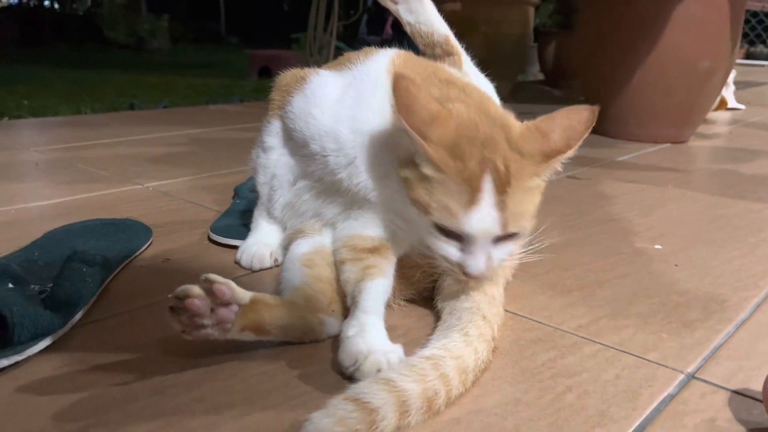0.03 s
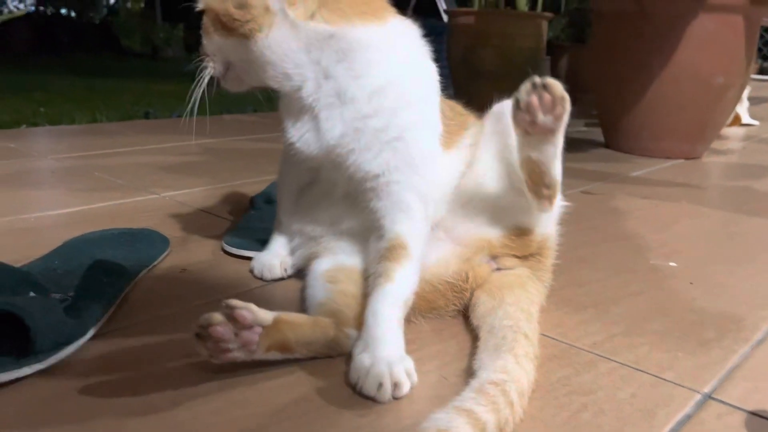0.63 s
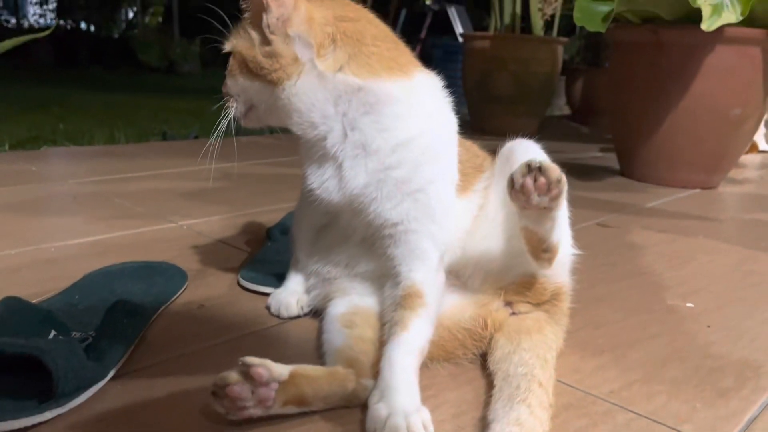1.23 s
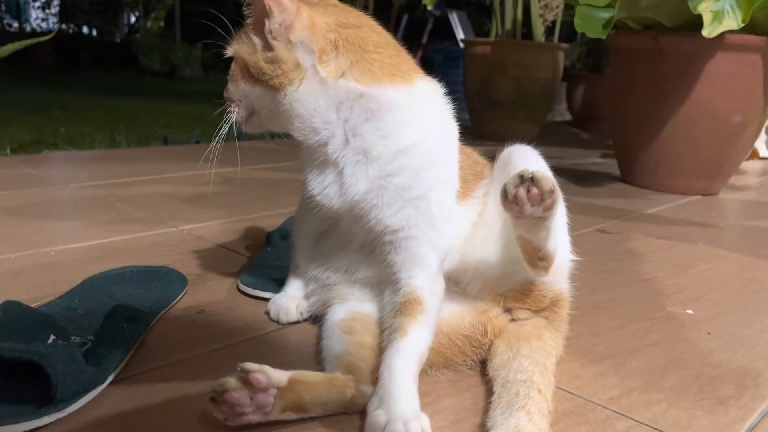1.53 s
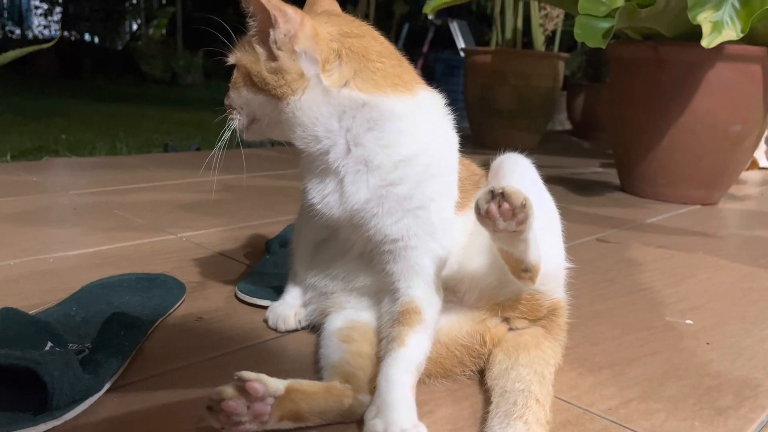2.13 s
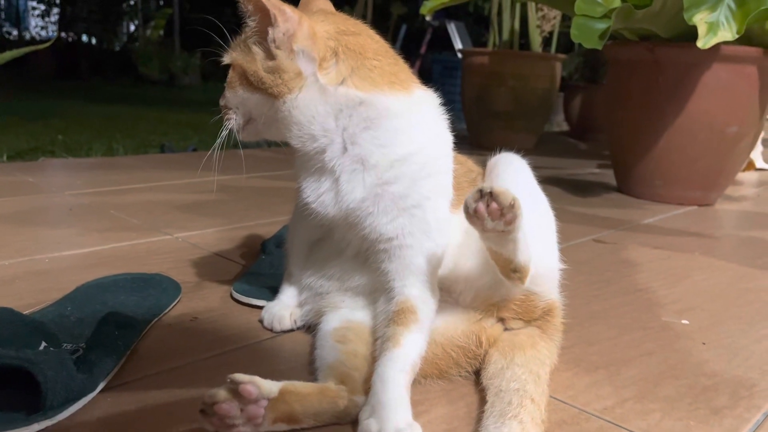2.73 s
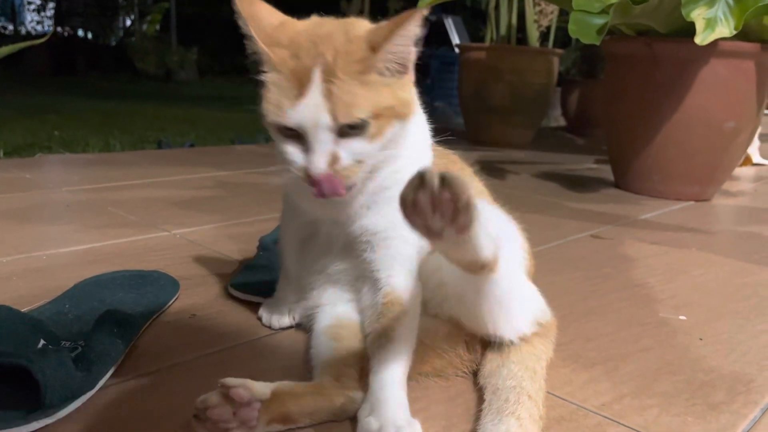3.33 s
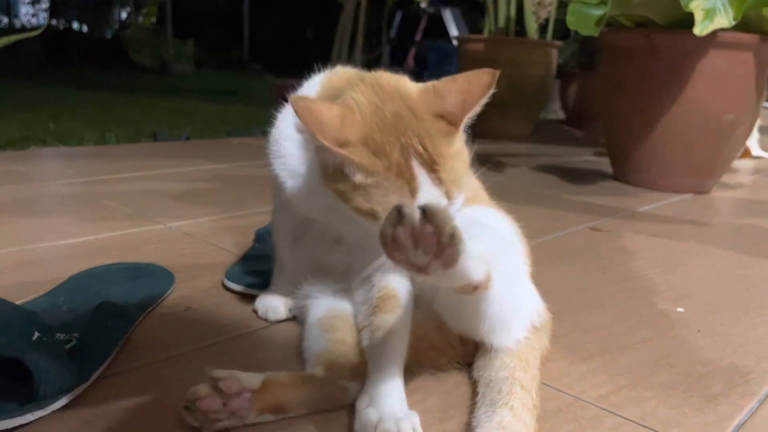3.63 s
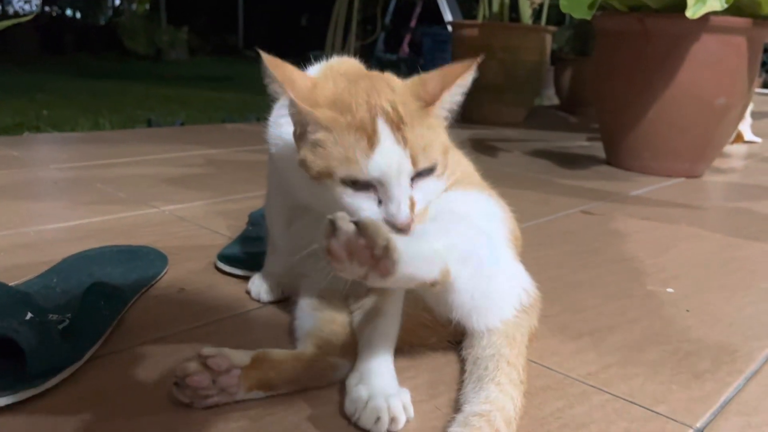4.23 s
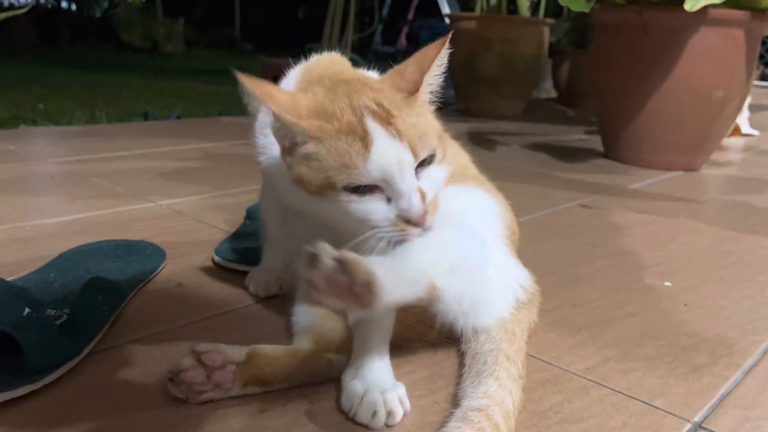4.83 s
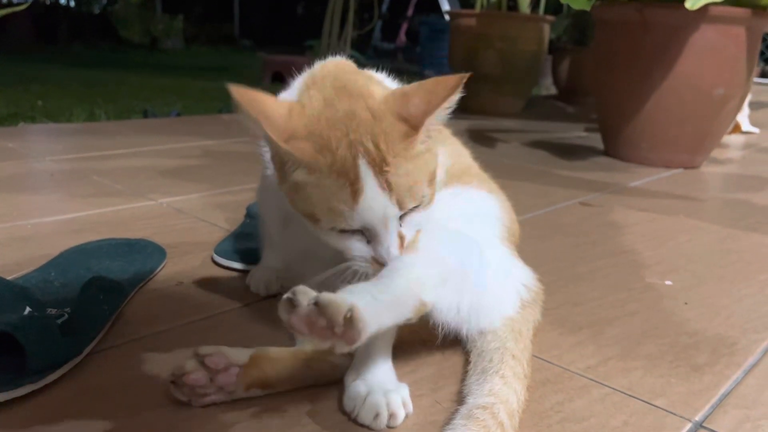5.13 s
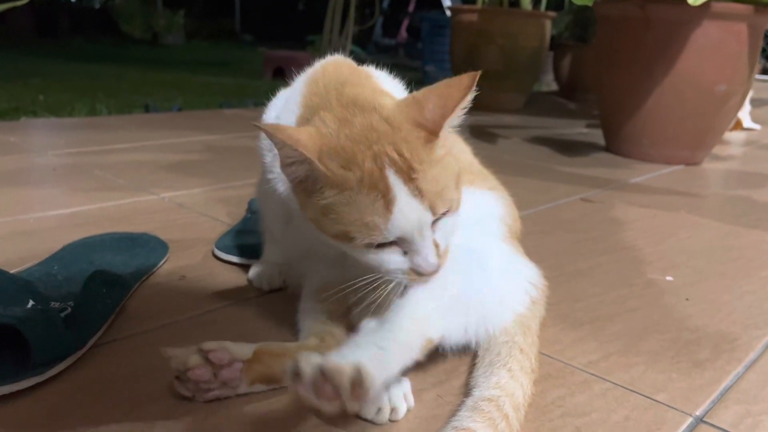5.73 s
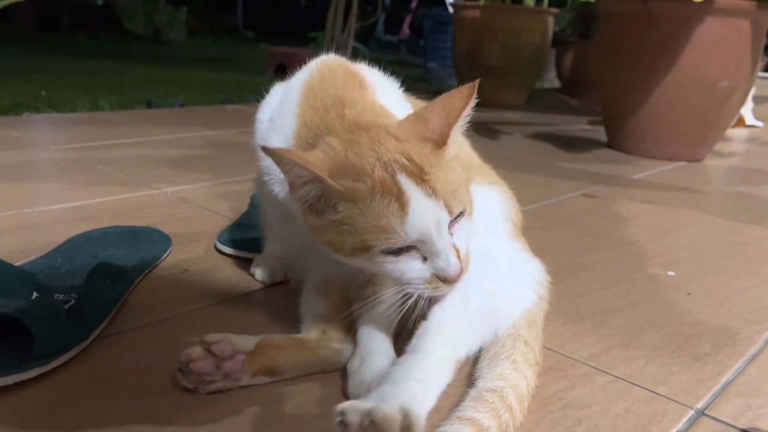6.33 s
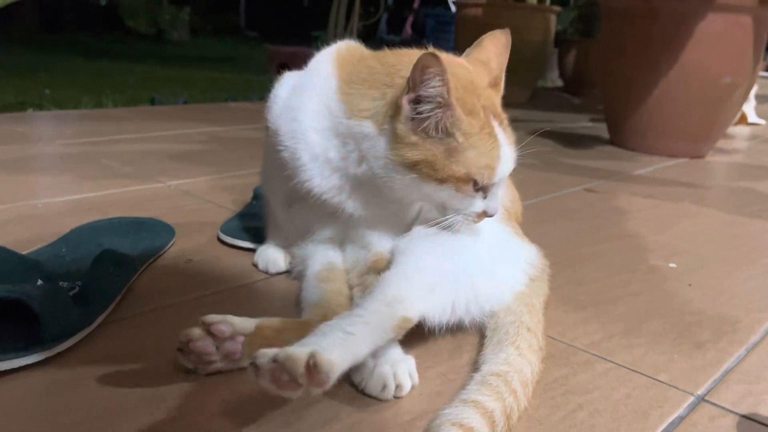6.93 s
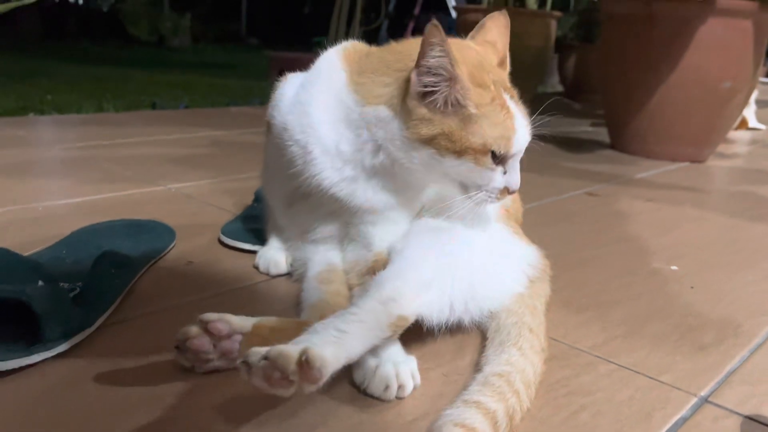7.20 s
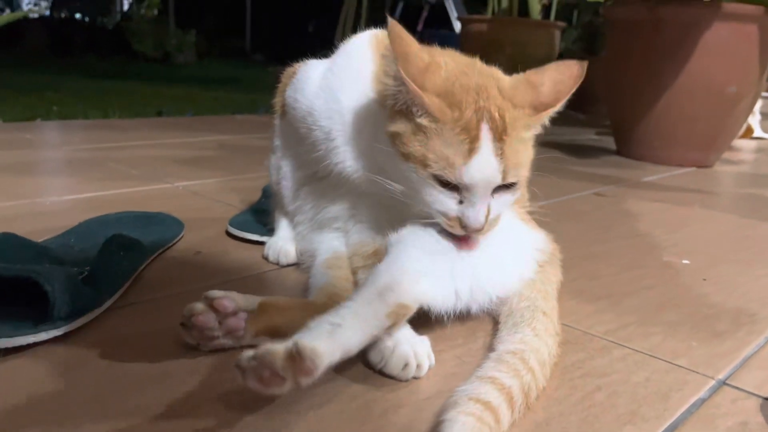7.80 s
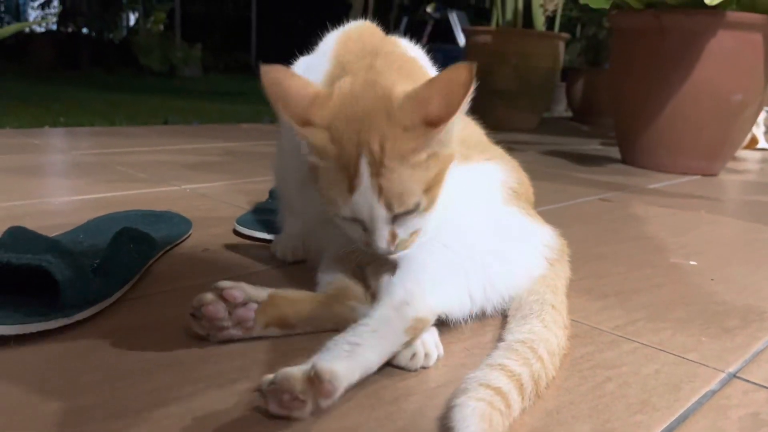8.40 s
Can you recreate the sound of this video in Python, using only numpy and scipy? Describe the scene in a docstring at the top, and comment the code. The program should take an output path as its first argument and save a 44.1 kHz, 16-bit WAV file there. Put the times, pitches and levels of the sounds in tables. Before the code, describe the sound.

On a patio at night, an air conditioner's outdoor unit gives a steady low hum with rumbling, rushing air. One insect chirps faintly, high and fast, over a thin hiss of distant insects. Close to the microphone a cat grooms itself with soft rustles. A dull thump comes early, then a few soft knocks and more thumps, and faint wet tongue ticks follow in the second half.

```python
"""On a tiled patio at night, an air conditioner's outdoor unit hums and blows behind everything.
Its compressor and fan make the tones, and the moving air makes the rumble and rush.
One insect rasps its wings in high, fast chirps over distant insects and a faint, very high hiss.
Close by a cat grooms itself, and its tongue makes wet ticks.
A few soft rustles, thin whistles, knocks and dull thumps break the steady sound."""
import sys
import numpy as np
from scipy import signal
from scipy.fft import rfft, irfft, next_fast_len
from scipy.io import wavfile

SR = 44100
rng = np.random.default_rng(int(sys.argv[2]) if len(sys.argv) > 2 else 0)


def to_wav(s):
    """Save 16-bit WAV."""
    ch = np.atleast_2d(s).T  # columns
    pcm = np.round(np.clip(ch, -1, 1) * 32767)  # PCM
    wavfile.write(sys.argv[1], SR, pcm.astype(np.int16))


N = 373086

# Stereo columns: balance is how much louder the left side is, lead is how far its wave runs ahead,
# and likeness is how alike the two sides are.
# compressor speed: (time [s], pumping strokes [1/s])
COMPRESSOR_SPEED = [(0, 118.6), (1.1, 118.4), (2, 118.7), (3, 118.6), (4, 118.7), (5, 118.1), (6, 118.6),
                    (6.8, 118.9), (7.6, 118.6), (8.4, 118.8)]
# compressor hum: (multiple of the stroke rate, level [dB], balance [dB], lead [rad])
COMPRESSOR_TONES = [(2, -34, -0.2, -0.5), (3, -54.5, 1.5, -1.05), (4, -56.5, 1, -3.0), (6, -64.5, -16, 3.0),
                    (8, -64.5, -4, -1), (10, -68, -3, -2)]
# fan tones: (multiple of the shaft rate [rounded when used], level [dB], balance [dB], lead [rad])
FAN_TONES = [(4, -70, -4, 0.0), (5, -43, -0.5, -0.056), (6, -48.5, -0.5, -0.051), (7, -45, 1.5, 0.014),
             (8, -57, 6, 0.012), (11, -58, -4, 0.4), (12, -57, 10, 0.5), (16.9, -50, 0, -0.7),
             (36, -55, -2.5, 0.46), (38, -62, 5, 0.035), (71.75, -63, -2.5, 1.66)]
# the unit's low air noise: (frequency [Hz], level [dB per Hz], balance [dB], lead [rad], likeness [0-1])
AIR_RUMBLE = [(19.8, -88, 7, 2.5, 0.7), (31.8, -76, -1, 0.5, 0.8), (45, -62, 1, -0.3, 1),
              (65, -64, -0.5, -0.6, 0.89), (90.5, -61.5, 2, -0.3, 1), (121, -66, 0.5, -0.2, 0.98),
              (153, -61.5, -1, -0.35, 0.86), (186, -70.5, 0.5, 0.5, 0.5), (223.4, -61, 3, -0.26, 1),
              (266, -70, 3, -0.7, 0.82), (297, -68, 0, -0.85, 0.91), (419, -73, -1, -1.2, 0.76),
              (514, -78.5, 4, -2, 0.42)]
# air rushing through the grille: same columns as AIR_RUMBLE
GRILLE_RUSH = [(470, -82, 3, -1.5, 0), (618, -80, -1.5, -2.5, 0.86), (755, -83, -5, -3, 0),
               (1180, -86, 0, -1.76, 0.44), (1494, -87, -5, -2.5, 0.72), (1713, -95.5, 3, -1, 0.63),
               (2300, -99, 4.5, 1.14, 0.5), (2950, -98, 2, 0.83, 0.8), (3150, -101.5, 3, 1.2, 0.4),
               (4400, -105.8, 5.5, 1.45, 0.7), (5350, -108.8, 5, -2, 0.5), (7100, -109.5, 0, -0.4, 0.3),
               (8000, -111, 0, -3, 1), (13500, -130, -1.5, -4.5, 0.8), (15500, -138, -2, -4.5, 0.8)]
# slow swell of the rushing air: (time [s], gain [dB])
RUSH_SWELL = [(0, 0.5), (3.2, 0), (3.7, -0.4), (5.1, 0.5), (5.45, 0), (5.63, -1), (5.9, -0.6), (6.35, 0.1),
              (6.7, 1), (7.35, -0.5), (8.46, -0.2)]
# the casing, ringing in the moving air: (pitch [Hz], width [Hz], level [dB], lead [rad], likeness [0-1])
CASING_BANDS = [(498, 15, -65, -.5, 0.7), (605, 24, -65.5, -2.5, 0.5), (779, 7.7, -68.5, 2, 1),
                (1049, 15, -68.5, -1.5, 0.6), (1182, 19, -71.5, -0.5, 0.74), (1438, 36, -65.5, -2, 0.8),
                (1640, 24, -75, -3, 0.9), (1810, 59, -77, 2, 0.6), (2920, 180, -78, 1, .7)]
# three bands of distant insects, then a faint, very high hiss: same columns as CASING_BANDS
HIGH_BANDS = [(8500, 1200, -75, 3.1, 1), (10600, 890, -73.2, 0.9, 0.97), (12100, 1500, -82.5, 0, 0.98),
              (15200, 1300, -87.5, np.pi, 1)]
# dull thumps: (time [s], level [dB], time to fade by 60 dB [s])
DULL_THUMPS = [(.53, -28, 0.19), (3.68, -34, 0.49), (4.73, -28.5, .5), (4.98, -28, .2)]
# soft knocks, the first with two quick bounces: (time [s], gain [dB])
SOFT_KNOCKS = [(2.436, -1), (2.448, -2.5), (2.472, -8), (2.92, -11), (3.28, -9)]
# what a knock rings with: (pitch [Hz], width [Hz], base level [dB], time to fade by 60 dB [s])
KNOCK_BANDS = [(630, 150, -40.5, .12), (800, 140, -48, .2), (1200, 420, -51.5, .17),
               (1850, 600, -59.5, .22), (2780, 450, -60.5, .24), (4400, 1500, -69, 0.2)]
# faint whistles and squeaks: (time [s], length [s], level [dB], pitch [Hz], width [Hz])
THIN_WHISTLES = [(-.04, 0.13, -56.5, 910, 60), (.03, .21, -70, 2800, 110), (0, 0.25, -69.5, 3720, 230),
                 (1.78, .1, -66, 4630, 220), (1.85, .3, -72, 4600, 320), (2.885, .08, -71.5, 4270, 110),
                 (7.619, 0.26, -64.5, 2900, 120), (7.62, 0.16, -71, 2494, 100), (7.65, 0.2, -68, 1860, 130)]
# soft rustles: (time [s], length [s], level [dB], pitch [Hz], width [Hz], fine hiss level [dB])
SOFT_RUSTLES = [(-.08, 0.45, -66.5, 3400, 2400, -90), (0.501, .33, -75, 5200, 5000, -83),
                (1.64, .1, -65, 2700, 2800, -90), (1.773, 0.15, -64, 2500, 2900, -82),
                (1.959, 0.16, -68.5, 4000, 2400, -90), (2.14, .19, -69, 3900, 2600, -82),
                (2.79, 0.23, -73, 3400, 3000, -87), (2.885, .12, -67.5, 3900, 3400, -80),
                (3.592, .09, -72, 4500, 4500, -87), (3.813, 0.15, -71, 3800, 3500, -87),
                (5.18, .27, -69, 2299, 1200, -87), (7.59, 0.37, -64, 2500, 1400, -92)]
# the near insect's wing, first its ringing core, then the rasp below it:
# (pitch [Hz], width [Hz], relative level [dB], lead [rad], likeness [0-1])
WING_BANDS = [(8770, 110, 1.5, 2.65, 1), (8530, 170, .5, 3.0, 1), (8250, 850, -.5, -3.12, .998),
              (7820, 330, -8, 3.1, .998)]
# the near insect starts briskly, then settles: (time [s], chirps [1/s])
CHIRP_PACE = [(0.1, 8.6), (1, 7.64), (4.8, 7.59), (5.3, 7.71), (8.4, 7.36)]
# how hard the near insect works: (time [s], chirp level [dB])
CHIRP_LEVELS = [(0.1, -69), (0.6, -64), (1, -64), (2.2, -64), (2.7, -62), (4.2, -65), (5.1, -65),
                (6.1, -62.3), (7, -66), (8.4, -66)]
# wet ticks of tongue and lips: (time [s], level [dB], pitch [Hz], width [Hz], time to fade by 60 dB [s])
TONGUE_TICKS = [(2.245, -75, 13000, 3600, .012), (4.312, -70.5, 11800, 2800, .05),
                (4.341, -68.5, 6600, 900, .025), (4.584, -59.5, 6200, 1100, .016),
                (4.593, -62, 6104, 1100, 0.014), (5.04, -76, 13600, 3500, .07),
                (5.188, -68.5, 11200, 2800, .06), (5.322, -71.5, 12500, 3700, .12),
                (5.699, -58.5, 11600, 4200, 0.018), (6.612, -71, 11300, 2700, .12)]


def amp(db):
    """Turns decibels into a gain to multiply by."""
    return 10 ** (np.asarray(db) / 20)


def evened(x):
    """Scales a signal so that its average size (rms) is 1."""
    return x / np.sqrt(np.mean(np.abs(x) ** 2) + 1e-30)


def add(mix, start_s, sound):
    """Adds a stereo sound at its start time, cut to fit the scene."""
    at = round(start_s * SR)
    sound = sound[:, max(-at, 0):]
    part = mix[:, max(at, 0):][:, :sound.shape[1]]
    part += sound[:, :part.shape[1]]


def wander(rate_hz):
    """A smooth random wobble of average size 1, mostly slower than rate_hz."""
    hz = np.fft.rfftfreq(2048, 256 / SR)
    slow = irfft(rfft(rng.standard_normal(2048)) * np.exp(-(hz / rate_hz) ** 2))
    return evened(np.interp(np.arange(N) / 256, np.arange(len(slow)), slow))


def stereo_gains(balance_db, lead):
    """Left and right gains, as complex numbers that set both level and phase."""
    half = np.atleast_1d(amp(balance_db / 2) * np.exp(.5j * lead))
    pair = np.array([half, 1 / half])
    return pair / np.sqrt(np.mean(np.abs(pair) ** 2, axis=0))


def noise(gain, balance_db, lead, likeness):
    """Stereo noise with a given gain at each frequency."""
    a, b, c, d = rng.standard_normal((4, len(gain)))
    same = np.clip(likeness, 0, 1)
    left = a + 1j * b
    right = same * left + np.sqrt(1 - same ** 2) * (c + 1j * d)
    spectrum = np.array([left, right]) * gain * stereo_gains(balance_db, lead)
    return irfft(spectrum) * np.sqrt(len(gain) * SR / 2)


def band(count, hz, width_hz, likeness, balance_db=0, lead=0):
    """Noise of average size 1 around one pitch; the narrower it is, the more it sounds like a tone."""
    f = np.fft.rfftfreq(2 * next_fast_len(count // 2 + 256), 1 / SR)
    hump = (1 + ((f - hz) / width_hz) ** 2 / 2) ** -3
    return evened(noise(hump, balance_db, lead, likeness))[:, :count]


def bands(table):
    """Several steady bands of noise played together."""
    return sum(amp(db) * band(N, hz, width, same, lead=lead) for hz, width, db, lead, same in table)


def stroke(length_s, hz, width_hz, likeness):
    """A band of noise, off to the left, that swells quickly and fades more slowly."""
    progress = np.linspace(0, 1, round(length_s * SR))
    swell = np.abs(np.sin(np.pi * progress ** .59))
    return swell * band(len(progress), hz, width_hz, likeness, balance_db=5.5, lead=.33)


def taps(table, rise_s, likeness):
    """Short blows, each dying away in one band of noise."""
    out = np.zeros((2, N))
    for start, db, hz, width, fade_s in table:
        t = np.arange(round((fade_s + rise_s) * SR)) / SR
        shape = (1 - np.exp(-t / rise_s)) * amp(-60 * t / fade_s)
        add(out, start, amp(db) * shape * band(len(t), hz, width, likeness))
    return out


def air(table, low_hz, high_hz, ripple_db, ripple_hz):
    """Air noise between two frequencies, with narrow random humps like those from wall and floor echoes."""
    f = np.fft.rfftfreq(2 * next_fast_len(N // 2 + 1), 1 / SR) + 1e-3
    hz, *columns = np.transpose(table)
    db, balance_db, lead, likeness = (np.interp(np.log(f), np.log(hz), c) for c in columns)
    knots = rng.standard_normal((2, 4096))
    humps_db, sideways_db = (ripple_db * np.interp(f / ripple_hz, np.arange(4096), k) for k in knots)
    edges = ((1 + (low_hz / f) ** 16) * (1 + (f / high_hz) ** 16)) ** -.5
    return noise(edges * amp(db + humps_db), balance_db + sideways_db, lead, likeness)[:, :N]


def spinning_tones(table, turns, flutter, flutter_hz, growth):
    """Tones of a turning part, loosely in step so they throb once a turn; higher ones flutter more."""
    out = np.zeros((2, N))
    rate_hz = turns[-1] * SR / N
    turns = turns + rng.random()
    for multiple, db, balance_db, lead in table:
        depth = flutter * (multiple * rate_hz / 1000) ** growth
        sway = 1 + depth * (wander(flutter_hz) + 1j * wander(flutter_hz))
        cycles = round(multiple) * turns + .3 * rng.random()
        tone = evened(sway) * np.exp(2j * np.pi * cycles)
        out += np.sqrt(2) * amp(db) * (stereo_gains(balance_db, lead) * tone).real
    return out


def outdoor_unit(shaft_hz=11.67):
    """A compressor that drifts in speed, a steady fan, and the air that the fan drives."""
    t = np.arange(N) / SR
    strokes = np.cumsum(np.interp(t, *np.transpose(COMPRESSOR_SPEED))) / SR
    hum = spinning_tones(COMPRESSOR_TONES, strokes, flutter=.42, flutter_hz=5.3, growth=1.15)
    fan = spinning_tones(FAN_TONES, shaft_hz * t, flutter=.14, flutter_hz=4.4, growth=.41)
    rumble = air(AIR_RUMBLE, low_hz=8, high_hz=495, ripple_db=1, ripple_hz=7)
    rush = air(GRILLE_RUSH, low_hz=515, high_hz=17000, ripple_db=2, ripple_hz=12)
    casing = bands(CASING_BANDS)
    swell_db = np.interp(t, *np.transpose(RUSH_SWELL)) + .9 * wander(15)
    return hum + fan + rumble * amp(.29 * wander(6)) + (rush + casing) * amp(swell_db)


def far_insects_and_hiss():
    """Far-off insects blur into nearly steady bands; a faint, very high hiss lies above them."""
    return bands(HIGH_BANDS) * amp(.5 * wander(12))


def thumps(hz=74.6, width_hz=25):
    """Dull blows, each a short, deep boom."""
    blows = [(start, db, hz, width_hz, fade_s) for start, db, fade_s in DULL_THUMPS]
    return taps(blows, rise_s=.004, likeness=1)


def knocks():
    """Soft blows, each ringing briefly in several bands at once."""
    rings = [(start, gain_db + db, hz, width, fade_s)
             for start, gain_db in SOFT_KNOCKS for hz, width, db, fade_s in KNOCK_BANDS]
    return taps(rings, rise_s=.003, likeness=.68)


def whistles():
    """Faint whistles of narrow noise, each holding its pitch."""
    out = np.zeros((2, N))
    for start, length, db, hz, width in THIN_WHISTLES:
        add(out, start, amp(db) * stroke(length, hz, width, likeness=.75))
    return out


def rustles(grain_db=1.8, grain_hz=60):
    """Soft, slightly grainy rustles close by: a broad hiss, and a finer one high above it."""
    out = np.zeros((2, N))
    for start, length, db, hz, width, fine_db in SOFT_RUSTLES:
        add(out, start, amp(db) * stroke(length, hz, width, likeness=.81))
        add(out, start, amp(fine_db) * stroke(length, hz=12000, width_hz=2600, likeness=.95))
    return out * amp(grain_db * wander(grain_hz))


def chirp_rhythm(hold_s, first_s=.111, jitter_s=.004, uneven_db=.8, length_spread=.25):
    """The time, level and length of a chirp for each beat of the insect, all a little uneven."""
    t = np.arange(round(first_s * SR), N) / SR
    beats = np.floor(np.cumsum(np.interp(t, *np.transpose(CHIRP_PACE))) / SR)
    times = t[np.diff(beats, prepend=-1) > 0]
    late, strong, long = rng.standard_normal((len(times), 3)).T
    levels = np.interp(times, *np.transpose(CHIRP_LEVELS)) + uneven_db * strong
    return zip(times + jitter_s * late, levels, hold_s * np.exp(length_spread * long))


def near_insect(rise_s=.007, hold_s=.03, echo_s=.053, echo_db=-6, tail_db=-1.5, tail_s=.65, drift_hz=45):
    """Each chirp is a short, ringing rasp of the wings; the garden draws it out and a wall returns it."""
    t = np.arange(SR // 3) / SR
    fade_s = tail_s * np.array([[1.1], [1]])  # the wing's core lingers longer than its rasp
    tail = amp(tail_db - 60 * t / fade_s) * np.minimum(t / hold_s, 1)
    power = np.zeros((2, N))
    for start, db, hold in chirp_rhythm(hold_s):
        chirp = np.interp(t, [0, rise_s, hold, hold + 2 * rise_s], [0, 1, 1, 0])
        echo = amp(echo_db) * np.interp(t - echo_s, t, chirp)
        add(power, start, amp(db) ** 2 * (chirp ** 2 + echo ** 2 + tail ** 2))
    core_gain, rasp_gain = np.sqrt(power)
    # the core's pitch strays from chirp to chirp
    drift = np.exp(2j * np.pi * np.cumsum(drift_hz * wander(6.5)) / SR)
    core = (signal.hilbert(bands(WING_BANDS[:1])) * drift).real
    rasp = bands(WING_BANDS[1:])
    return (core_gain * core + rasp_gain * rasp) / np.std(core + rasp)


def cat_tongue(rise_share=.12, grain_db=2, grain_hz=70):
    """The tongue peels off wet fur: a short, uneven fizz that opens softly and dies away."""
    out = np.zeros((2, N))
    for start, db, hz, width, fade_s in TONGUE_TICKS:
        t = np.arange(round(fade_s * SR)) / SR
        rise_s = rise_share * fade_s
        shape = np.minimum(t / rise_s, 1) * amp(-60 * np.maximum(t - rise_s, 0) / fade_s)
        add(out, start, amp(db) * shape * band(len(t), hz, width, likeness=.75))
    return out * evened(amp(grain_db * wander(grain_hz)))


def scene():
    """The unit and the insects, with the cat and other small sounds close by."""
    blows = thumps() + knocks()
    night = outdoor_unit() + near_insect() + far_insects_and_hiss()
    return blows + night + rustles() + whistles() + cat_tongue()


def record(dry, cutoff_hz=15780):
    """Fades both ends briefly and cuts off the very highest treble."""
    faded = dry * signal.windows.tukey(N, .001)
    lowpass = signal.firwin(511, cutoff_hz, window=("kaiser", 9), fs=SR)
    return signal.oaconvolve(faded, lowpass[None], "same")


dry = scene()
out = record(dry)
to_wav(out)
```